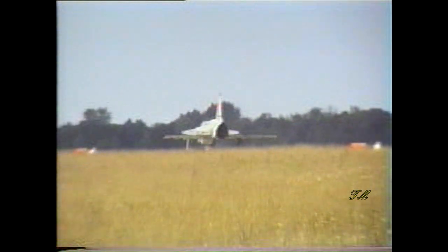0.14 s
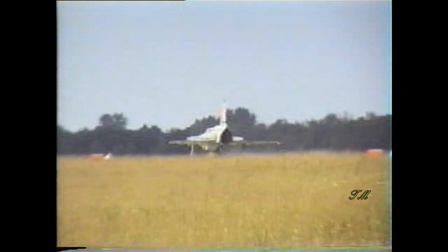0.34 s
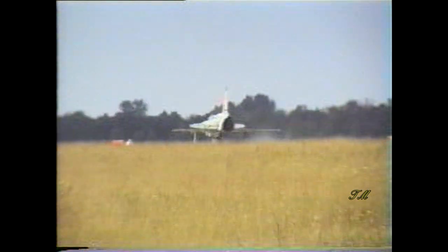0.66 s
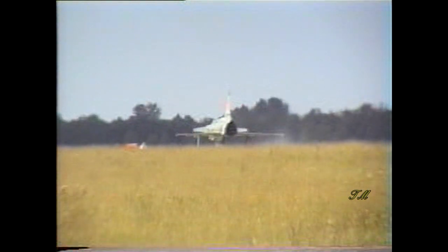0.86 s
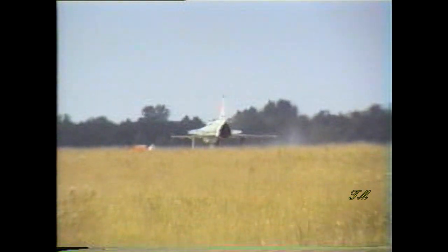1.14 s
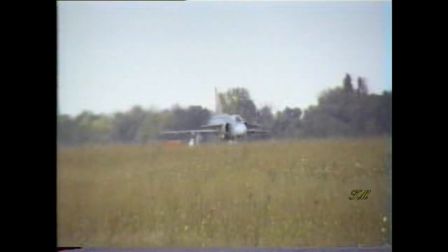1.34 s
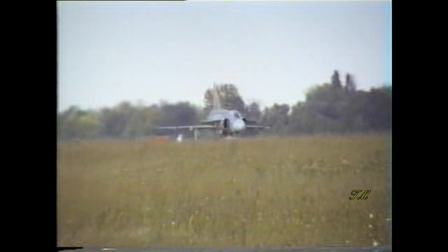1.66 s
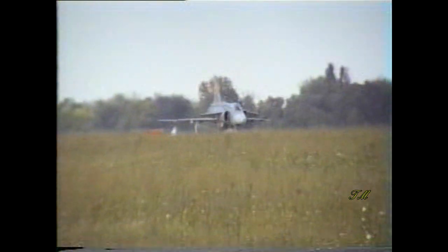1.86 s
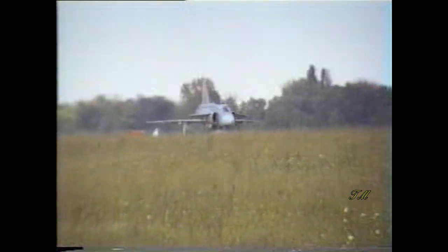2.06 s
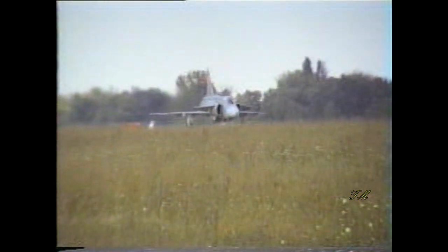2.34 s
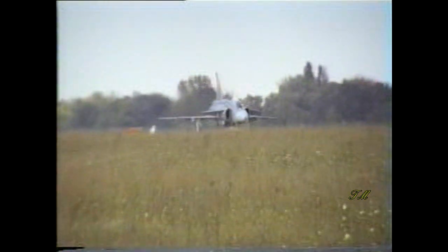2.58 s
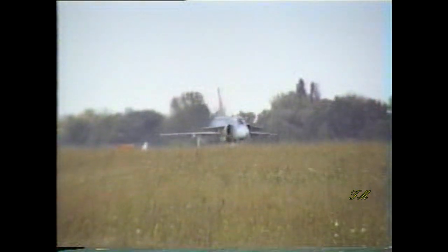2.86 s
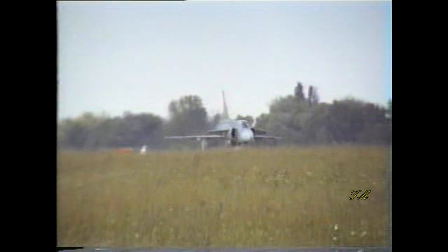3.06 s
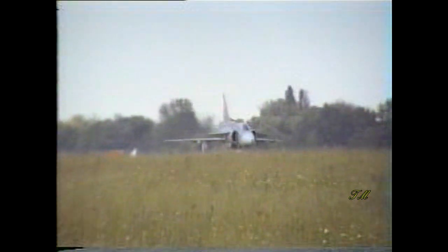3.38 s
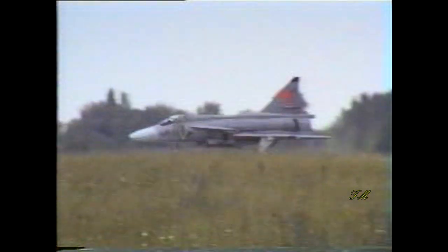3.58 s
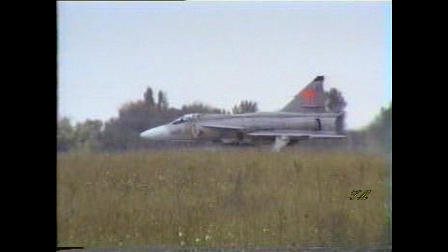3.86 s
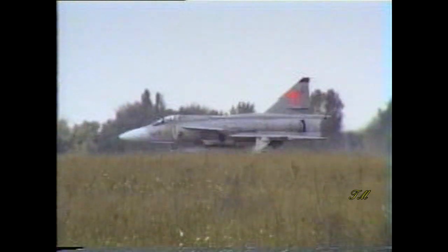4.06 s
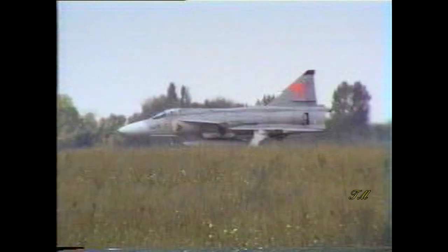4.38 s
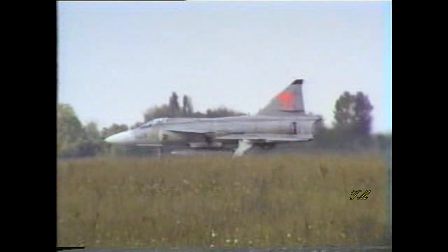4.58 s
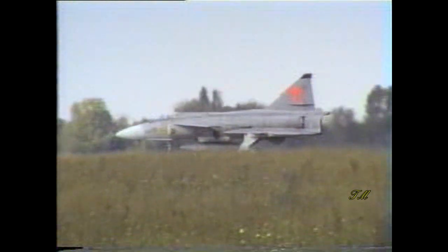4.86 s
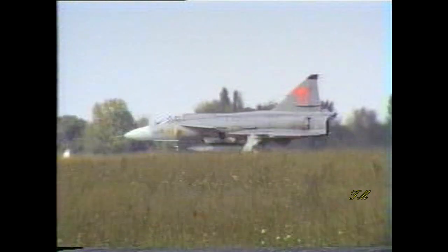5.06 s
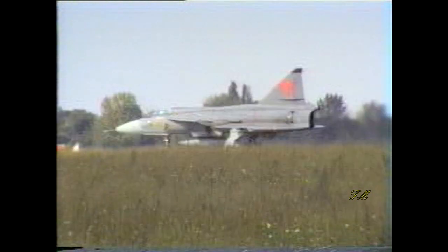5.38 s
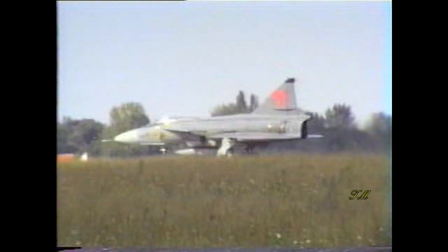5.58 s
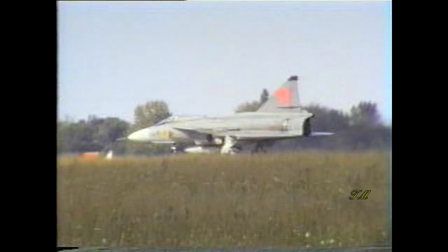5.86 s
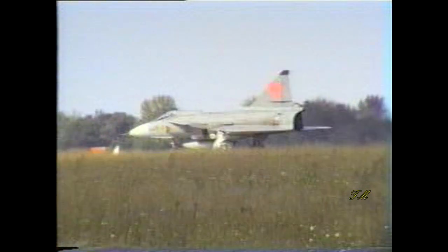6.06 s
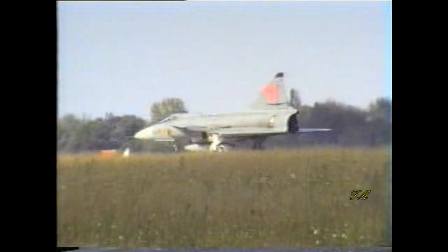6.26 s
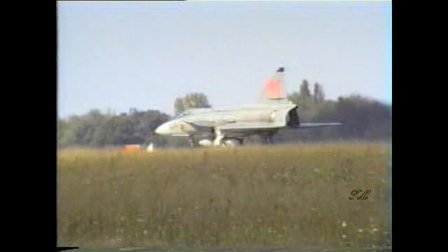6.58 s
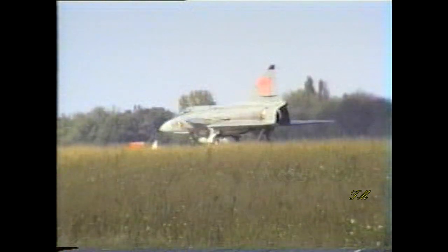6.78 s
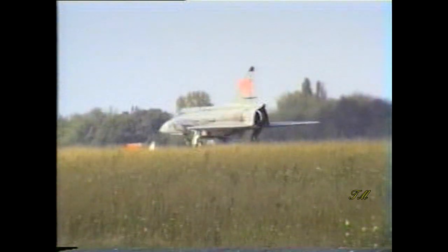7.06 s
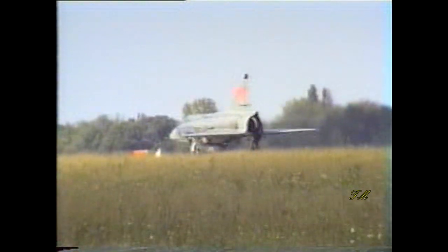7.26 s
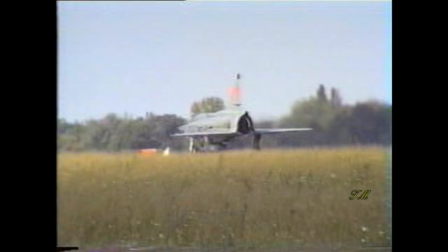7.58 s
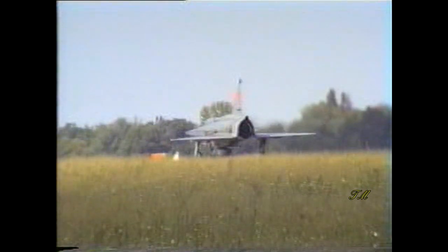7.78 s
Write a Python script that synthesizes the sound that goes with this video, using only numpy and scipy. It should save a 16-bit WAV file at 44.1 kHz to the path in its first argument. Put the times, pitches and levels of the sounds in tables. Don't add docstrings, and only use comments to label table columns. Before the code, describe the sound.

Heavy wind thumps open the scene, with a weak distant jet behind them. After about a second the whine jumps up in pitch and swells unevenly; more gusts batter the microphone and a far bird gives one falling note. Then the jet comes forward, whining and roaring brightly, turning its tail with a ragged hiss. Nearly mono old tape camera sound with constant hiss.

```python
import sys
import numpy as np
from scipy import signal
from scipy.fft import rfft, irfft, next_fast_len
from scipy.io import wavfile
from scipy.ndimage import uniform_filter1d

SR = 44100
rng = np.random.default_rng(int(sys.argv[2]) if len(sys.argv) > 2 else 0)


def pcm_store(signal):
    levels = np.round(np.clip(np.atleast_2d(signal), -1, 1) * 32767)
    wavfile.write(sys.argv[1], SR, levels.astype(np.int16).T)


def gain_from_db(level_db):
    decades = np.asarray(level_db, float) / 20
    return 10 ** decades


N = 349272
T = np.arange(N) / SR
SLOW = T[::32]
SIZE = next_fast_len(N, real=True)
FREQ = np.maximum(np.arange(SIZE // 2 + 1) * SR / SIZE, 1)

VIEW_STARTS = [
    0,
    1.2225,
    3.4635,
    8,
]

# frequency in Hz, level in dB per Hz.
HISS_COLOUR = [(200, -1.5), (6000, -2.5), (9000, -0.5), (12000, -1.5), (13500, -8.5), (14700, -14),
               (15300, -11), (16000, -3.5)]
# frequency in Hz,
# level in dB.
CAMERA_TONES = [(9093, -80), (11574, -81), (12813, -85), (13227, -87), (15125, -86), (15325, -88),
                (15625, -69), (15675, -85)]
# frequency in Hz, level in dB.
MOTOR_TONES = [(413.5, -66), (827, -60), (7441, -82), (9921, -83), (11161, -83)]
# time in seconds, pitch in Hz, level in dB.
BIRD_NOTE = [
    (3.23, 3290, -99),
    (3.27, 3260, -60),
    (3.34, 3140, -57),
    (3.4, 3090, -99),
]

# centre in seconds, peak in dB, half length in seconds, sharpness in dB per octave.
GUSTS = [(0, -16, 0.03, 1), (0.07, -26, 0.036, 5.5), (0.676, -33.5, 0.12, -1.5), (0.252, -28.5, 0.16, -2.5),
         (0.967, -28, 0.053, -4), (1.305, -26.5, 0.22, 3), (1.316, -20, 0.039, 2.5), (1.705, -27, 0.1, 1.5),
         (1.79, -21.5, 0.031, 1.5), (1.887, -23, 0.04, 2.5), (1.97, -20, 0.077, -4.5),
         (2.207, -29.5, 0.084, -6.5), (2.437, -28.5, 0.16, -1), (2.6, -26, 0.029, -11.5),
         (2.799, -19.5, 0.1, 3), (2.952, -23, 0.026, -1), (3.047, -27, 0.038, -4),
         (3.019, -20.5, 0.19, 0.5), (3.198, -26.5, 0.045, 6.5), (3.407, -18.5, 0.12, -2),
         (3.597, -32.5, 0.16, 7)]
# centre in seconds, peak in dB, half length in seconds,
# sharpness in dB per octave.
PUFFS = [
    (5.95, -51, .08, -2),
    (7.45, -35.5, 0.036, -4),
    (7.63, -34.5, 0.029, -8),
]
# time in seconds, peak in dB, pitch in Hz.
THUMPS = [(0.027, -20, 112), (0.057, -8.5, 113), (0.09, -6.5, 103), (0.125, -9.5, 112), (0.175, -14.5, 102),
          (1.116, -21, 85), (1.143, -18, 134), (1.17, -20, 106), (1.237, -17, 108), (1.274, -24, 93),
          (1.294, -21, 83), (1.317, -16.5, 133), (1.335, -12, 107), (1.357, -23, 107), (1.414, -21, 107),
          (1.438, -19.5, 168), (1.674, -21, 107), (1.697, -12.5, 158), (1.727, -19, 76), (1.773, -16, 95.5),
          (1.814, -21, 84), (1.835, -8, 93), (1.858, -6, 71), (1.879, -11, 68), (1.905, -14, 57),
          (1.935, -15, 81), (1.978, -15, 75.96), (1.999, -13, 84), (2.027, -23, 67), (2.162, -18.5, 116),
          (2.603, -21.5, 57.92), (2.636, -23, 86), (2.688, -20, 88), (2.737, -11.5, 95), (2.775, -9, 75),
          (2.826, -16.5, 82.5), (2.867, -13.5, 124), (2.923, -14, 64), (2.958, -11, 108), (2.992, -20, 100),
          (3.034, -7.5, 120), (3.055, -9.5, 111), (3.089, -15, 133), (3.11, -21, 101), (3.139, -25, 131),
          (3.165, -12, 82), (3.191, -12, 109), (3.227, -13, 106), (3.254, -20, 119), (3.276, -19, 96),
          (3.302, -22, 81), (3.33, -18, 97), (3.353, -10.5, 63), (3.394, -29, 67), (3.427, -13.5, 122),
          (3.458, -11.5, 94), (3.495, -22, 98), (3.528, -22, 85), (3.578, -24, 93), (3.648, -23, 101)]
# time in seconds, level in dB, exhaust thrum in dB.
RUMBLE = [(0, -46.5, 15), (3.7, -37.5, -3.5), (4.9, -38, -3.5), (5.5, -40, 0), (6, -40, 5.5),
          (6.8, -38.5, 2.5), (7.5, -36.5, 0), (7.92, -35.5, 0)]
# frequency in Hz, level in dB per Hz.
GUST_COLOUR = [(10, -14), (25, -13), (50, -1.5), (90, -0.5), (140, -5), (200, -9.5), (300, -25), (450, -43)]
# frequency in Hz, level in dB per Hz.
RUMBLE_COLOUR = [(10, -16), (22, -2), (43, -1), (76, -5), (141, 0.5), (170, -7), (215, -15), (450, -29.5)]

# time in seconds, jet level in dB, how far the intake faces the microphone in dB.
ROAR = [
    [(0, -48, 0.5), (.5, -47.5, -1.5), (1.222, -51.5, 2)],
    [(1.222, -43, 4), (1.65, -39.5, 2), (2.0, -42.5, 0), (2.5, -41.5, 0.5), (2.85, -40.5, 5.5),
     (3.463, -39, 1.5)],
    [(3.463, -34, 9.5), (4.0, -32.5, 9), (4.45, -32, 6.5), (5.0, -32.5, 5), (5.5, -35, 2.5),
     (6.25, -33.5, -1), (6.8, -32.5, -1.5), (7.42, -28, -4), (7.92, -34, -3.5)],
]
# frequency in Hz, level in dB per Hz.
TAIL_COLOUR = [(300, -19), (480, -5.5), (650, -1), (850, 0), (1200, -5.5), (1700, -11.5), (2100, -9.5),
               (2600, -19.5), (3200, -25), (4000, -22), (5000, -35), (7000, -45)]
# frequency in Hz, level in dB per Hz.
NOSE_COLOUR = [(300, -13), (490, -17), (750, 4), (1200, -2), (1450, 2.5), (2000, -12.5), (2250, -5),
               (2700, -12.5), (3500, -18.5), (4300, -24), (5300, -32), (7000, -69)]
# frequency in Hz, level in dB per Hz.
TURN_COLOUR = [(300, -18.5), (450, -17), (650, -3.5), (950, 1), (1200, -11), (1450, -4), (1780, -13.5),
               (1960, -17.5), (2350, -15), (3500, -26.5), (4300, -28.5), (4800, -25.5), (5400, -39.5),
               (7000, -42)]
# time in seconds, frequency factor.
HUMP_SHIFT = [
    (3.7, 0.99),
    (4.5, 1.074),
    (5.5, 1),
]
# centre in seconds, frequency in Hz, change in dB, half
# length in seconds.
ROAR_CHANGES = [(1.35, 690, -5.5, 0.17), (2.97, 1330, -11, 0.46), (5.7, 1140, -6.5, 0.089),
                (7.2, 1730, -2, 0.87), (4.9, 1750, -4, 0.06), (8.7, 1300, -1, .2), (3.2, 470, 7.5, 0.64),
                (6.9, 4900, 2, 0.67), (7.76, 4000, 4, 0.47), (7.77, 386, 8, 0.37), (2.2, 2200, -1.5, 0.37),
                (5.6, 1700, -0.5, .3), (6.6, 1480, -1.5, 1), (7.3, 870, -0.5, 0.21), (4.66, 1400, -4, 0.15),
                (1.2, 410, 2, .15), (2.6, 2220, -8, .07), (6.2, 2500, 6, 0.18), (7.8, 1300, -2.5, 0.11),
                (1.33, 380, -6, .08), (3.67, 360, 6, 0.22), (4.6, 670, 3.5, .12), (3.55, 4200, -0.5, .1),
                (4.62, 3800, 2, 0.11), (5.07, 3800, 1.5, 0.11), (5.07, 4800, 2.5, 0.077), (4.65, 4200, 1, 0.1),
                (7.8, 1040, -3.5, 0.1), (2.4, 370, -9, .1)]
# centre in seconds, lift in dB, half length in seconds.
FLARES = [(3.5, 4, 0.13), (4.2, 2.5, 0.073), (3.6, -2.5, 0.098), (6.6, 2, 0.092), (5.06, 2.5, 0.056),
          (8, -1, 0.071), (4.76, 2, 0.08), (5, 5, 0.087), (7.75, 1.5, 0.18), (8.6, 3, 0.089)]
# time in seconds, centre in Hz, level in dB.
NOZZLE = [(5.7, 4645, -75), (6.0, 4660, -58), (6.25, 4660, -62), (6.4, 4680, -58), (6.76, 4650, -61),
          (6.85, 4640, -51), (7.0, 4680, -57), (7.15, 4640, -54), (7.33, 4650, -52), (7.45, 4680, -54),
          (7.58, 4800, -56), (7.72, 4860, -53), (7.92, 4850, -57)]

TAIL_STAGES = [1, 1.331, 1.485]
STAGES = [1, 1.333, 1.467, .583]
# time in seconds, pitch in Hz.
BLADE_RATE = [(0, 1372), (.3, 1370), (1.222, 1365), (1.223, 1682), (1.8, 1678), (2.7, 1681), (3.463, 1678),
              (3.464, 1608), (3.96, 1606), (4.46, 1595), (4.72, 1588), (4.9, 1590), (5.1, 1580),
              (5.4, 1578), (5.65, 1572), (5.85, 1583), (6.15, 1593), (6.5, 1590), (6.93, 1583), (7.3, 1578),
              (7.92, 1575)]
# time in seconds, speed factor.
SECOND_SPOOL = [
    (4.75, 1),
    (5.0, 1.009),
    (5.5, 1.015),
    (5.68, 1),
]
# centre in seconds, peak in dB, half length in seconds.
SWELLS_1 = [(.33, -48.5, 0.076), (0.11, -54, .1), (.85, -58, 0.071), (1.03, -55, 0.062),
            (1.82, -39.5, 0.23), (2.31, -42, 0.23), (2.86, -44.5, 0.15), (3.35, -41, 0.08),
            (3.59, -26, 0.08), (3.72, -32, 0.03), (4.85, -38, 0.1), (5.65, -42, 0.088), (7.2, -40, 0.11),
            (3.87, -32, 0.18), (4.23, -34, 0.031), (5.19, -35.5, 0.54), (5.8, -32.5, 0.07),
            (6.14, -38, 0.14), (6.61, -39, 0.1), (7.52, -36, 0.029), (7.83, -37, 0.044)]
# centre in seconds, peak in dB, half length in seconds.
SWELLS_2 = [(2.92, -38.5, 0.086), (4.12, -39, .04), (.2, -67, .15), (.6, -59, .15), (.9, -60, 0.039),
            (1.35, -27.5, 0.12), (1.53, -28.5, 0.096), (1.78, -35, 0.069), (2.22, -34.5, 0.15),
            (2.74, -30, 0.14), (3.19, -38, 0.54), (3.5, -32.5, 0.037), (3.99, -35, 0.029),
            (3.94, -32, 0.23), (4.38, -31.5, 0.064), (4.76, -30.5, 0.072), (5.48, -32, 0.21),
            (6.38, -40, 0.051), (7.54, -40.5, 0.11), (7.84, -40, 0.07), (4.86, -35.5, 0.05),
            (5.28, -42, 0.045), (5.8, -45, 0.12), (6.9, -44, 0.079)]
# centre in seconds, peak in dB, half length in seconds.
SWELLS_3 = [(.3, -63, .1), (.6, -55, .06), (1.0, -64, .1), (1.52, -39, 0.15), (2.84, -37, 0.12),
            (3.04, -42, 0.1), (3.43, -39.5, 0.09), (3.5, -36, 0.057), (3.63, -30, 0.05), (3.93, -35, 0.045),
            (4.13, -33, 0.062), (4.27, -35, 0.11), (5.78, -34, 0.016), (6.55, -39.5, 0.13),
            (7.13, -32, 0.05), (7.39, -36.5, 0.065), (7.67, -33.5, 0.06), (7.9, -32.5, 0.064),
            (3.467, -27, 0.011), (5.1, -41, 0.037), (5.35, -45, 0.12), (6.38, -45, 0.035),
            (7.77, -36.5, 0.17), (3.2, -45.5, .12)]
# centre in seconds, peak in dB, half length in seconds.
SWELLS_4 = [(3.5, -40, 0.04), (3.62, -28.5, 0.029), (3.909, -38.5, 0.064), (4.44, -45, 0.096),
            (4.74, -43, 0.046), (5.48, -38, 0.26), (6.54, -33.5, 0.34), (7.17, -32, 0.079),
            (7.4, -30, 0.078), (7.58, -32.0, 0.061), (7.76, -40, 0.12)]
# centre in seconds, peak in dB, half length in seconds.
SWELLS_HALF = [
    (3.86, -42, 0.15),
    (4.7, -49, 0.19),
    (5.2, -49, 0.25),
    (6.4, -56.5, 0.36),
]
BETWEEN_DB = [
    (-59, -62.5, -63),
    (-55, -60, -51.5),
    (-46.5, -44, -44.5, -72),
]
SUM_PAIRS = [(0, 0), (0, 1), (0, 2), (1, 1)]
SUM_DB = [
    (-73, -90, -90, -76),
    (-59, -66, -61, -66.5),
    (-55, -66, -58, -65),
]
SUM_DRIFT = [
    (0, 0, 0, 0),
    (1.5, -1, 2, 3),
    (-.5, .5, .5, -.5),
]
# centre in seconds, lift in dB, half length in seconds.
SUM_SWELLS = [
    [(1.55, 2, 0.12), (1.83, -6, 0.11), (2.3, 4, 0.39), (2.72, -6, .05), (2.95, 4, .12), (3.3, 1, 0.11),
     (3.7, 3.5, .2), (4.5, 8, 0.1), (4.78, 0, 0.051), (5.05, 6, .08), (5.37, 10, .1)],
    [(1.5, 5, 0.16), (2.0, -4, .15), (2.85, 3, .06), (3.2, 4, .2), (3.5, 4, .05), (4.12, 17, .08)],
    [(1.45, 0, .2), (1.85, -1, .1), (2.2, 3, 0.22), (2.6, 1, .05), (2.9, 5, .17), (3.5, 10.5, 0.058),
     (4.1, 6, .1), (4.3, -1, 0.068), (6.6, 3, .08)],
    [(1.45, 1, .25), (2.2, 4, .3), (3.0, -6, .2), (3.38, 1, .06), (7.8, 13, .13)],
]

# frequency in Hz, level in dB.
SIDE_COLOUR = [(900, -55), (1500, -43.5), (2100, -27.5), (2800, -19), (4000, -29), (8000, -20),
               (15000, -22)]
# frequency in Hz, threshold in spreads.
SIDE_SHY = [(1400, .4), (2000, -.8), (3000, -.8), (3600, .1), (6500, .2), (7500, .6), (15000, 1.3)]


def fast(slow):
    return np.interp(T, SLOW, slow)


def curves(table):
    s, *columns = np.transpose(table)
    return np.array([np.interp(SLOW, s, column) for column in columns])


def walk(rate):
    held = max(int(len(SLOW) / T[-1] / rate), 1)
    steps = np.repeat(rng.standard_normal(len(SLOW) // held + 1), held)
    smooth = uniform_filter1d(uniform_filter1d(steps, held), held)
    return 1.294 * smooth[:len(SLOW)]


def bell(s, half_s):
    return np.exp(-((SLOW - s) / half_s) ** 2)


def lifts(table):
    return sum(db * bell(s, half_s) for s, db, half_s in table)


def swells(s, db, half_s):
    return gain_from_db(2 * db) @ bell(s[:, None], half_s[:, None])


def gate(view):
    seen = (SLOW >= VIEW_STARTS[view]) & (SLOW < VIEW_STARTS[view + 1])
    return uniform_filter1d(1. * seen, size=2)


def read(colour, hz):
    f, db = np.transpose(colour)
    return np.interp(np.log(hz), np.log(f), db)


def tint(x, colour):
    return irfft(rfft(x, SIZE) * gain_from_db(read(colour, FREQ)), SIZE)[:N]


def band_db(colour, lo_hz, hi_hz):
    inside = FREQ[(FREQ > lo_hz) & (FREQ < hi_hz)]
    return 10 * np.log10(gain_from_db(2 * read(colour, inside)).sum())


def turns(hz):
    return 2 * np.pi * np.cumsum(fast(hz)) / SR


def tone(phase, db, halo_db, halo_hz):
    straight = gain_from_db(db) * (1 + gain_from_db(halo_db) * walk(halo_hz))
    across = gain_from_db(db + halo_db) * walk(halo_hz)
    return np.sqrt(2) * (fast(straight) * np.sin(phase) + fast(across) * np.cos(phase))


def turbulence(gain, lo_hz, hi_hz, step, slow_db, quick_db, quick_rate):
    white = rfft(rng.standard_normal(SIZE)) * np.sqrt(SIZE / 2)
    out, swell, octaves = 0, walk(3.4), np.log2(FREQ)
    for octave in np.arange(np.log2(lo_hz), np.log2(hi_hz), step):
        shape = np.clip(1 - abs(octaves - octave) / step, 0, 1)
        band = irfft(white * shape, SIZE)[:N]
        swell = 0.33 * swell + 0.081 * walk(3.36)
        motion_db = slow_db * swell + quick_db * walk(quick_rate)
        out = out + band * fast(gain(2 ** octave) * gain_from_db(motion_db))
    return out


def hiss():
    x = tint(rng.standard_normal(N), HISS_COLOUR)
    return gain_from_db(-55.5) * x / x.std()


def camera():
    lines = 0
    for hz, db in list(CAMERA_TONES) + list(MOTOR_TONES):
        lines = lines + gain_from_db(db) * np.sin(2 * np.pi * (hz * T + rng.random()))
    return np.sqrt(2) * lines


def bird():
    hz, db = curves(BIRD_NOTE)
    return tone(turns(hz), db, halo_db=-12, halo_hz=40)


def thumps():
    out = np.zeros(N)
    for (s, db, hz), start in zip(THUMPS, rng.random(len(THUMPS))):
        near = slice(max(int((s - .04) * SR), 0), int((s + .04) * SR))
        cycles = (T[near] - s) * hz
        fade = np.exp(-(cycles / 0.55) ** 2)
        out[near] += gain_from_db(db) * fade * np.sin(2 * np.pi * (cycles + start))
    return out


def wind():
    drops_s, drop_length_s = 3.69, 0.0336
    pivot_hz, thrum_hz, thrum_octaves = 88.5, 100, 0.57
    bed_db = -2.5
    blowing = np.clip((drops_s - SLOW) / drop_length_s + .5, 0, 1)
    rumble_db, thrum_db = curves(RUMBLE)
    gust_own_db, rumble_own_db = band_db(GUST_COLOUR, 20, 350), band_db(RUMBLE_COLOUR, 20, 350)

    def blow(table, hz):
        s, db, half_s, sharp_db = np.transpose(table)
        octaves = max(np.log2(hz / pivot_hz), -1.2)
        return swells(s, db - gust_own_db + read(GUST_COLOUR, hz) + sharp_db * octaves, half_s)

    def gain(hz):
        thrum = thrum_db * np.exp(-(np.log2(hz / thrum_hz) / thrum_octaves) ** 2)
        rumble = gain_from_db(rumble_db - rumble_own_db + read(RUMBLE_COLOUR, hz) + thrum)
        gusts = blowing * gain_from_db(2 * bed_db) * blow(GUSTS, hz)
        return np.sqrt(gusts + blow(PUFFS, hz) + rumble ** 2)

    bands = turbulence(gain, 14.03, 460, step=2 / 5, slow_db=-3.3, quick_db=1.6, quick_rate=21)
    lumps = gain_from_db((.6 + 1.1 * blowing) * walk(45))
    return bands * fast(lumps) + thumps()


def nozzle():
    hz, db = curves(NOZZLE)
    phase = turns(hz * (1 + .004 * walk(9)))
    return fast(gate(2)) * tone(phase, db - 13 + 2.5 * walk(28), halo_db=13, halo_hz=380)


def roar():
    intake_octaves, intake_top_hz = 1.5, 4250
    exhaust_under_hz, exhaust_share = 560, 0.4
    dip_octaves = 0.24
    shift = curves(HUMP_SHIFT)[0]
    eddy_db = 0.78 * walk(14) + lifts(FLARES)
    colours = (TAIL_COLOUR, NOSE_COLOUR, TURN_COLOUR)
    intake_starts_hz = (1500, 950, 796)
    views = []
    for view, (table, colour, from_hz) in enumerate(zip(ROAR, colours, intake_starts_hz)):
        opening = gate(view) / gain_from_db(band_db(colour, 550, 880))
        views.append((*curves(table), colour, from_hz, opening))

    def gain(hz):
        seen_hz = hz / (shift if hz < 1400 else 1)
        bass = exhaust_share * np.clip(np.log2(exhaust_under_hz / hz), 0, 1)
        out = 0
        for jet_db, intake_db, colour, from_hz, opening in views:
            treble = np.clip(np.log2(hz / from_hz) / intake_octaves, 0, 1)
            treble = treble - np.clip(np.log2(hz / intake_top_hz), 0, 1)
            facing_db = (treble - bass) * intake_db + treble * eddy_db
            out = out + opening * gain_from_db(jet_db + facing_db + read(colour, seen_hz))
        change_db = 0
        for s, dip_hz, db, half_s in ROAR_CHANGES:
            nearness = np.exp(-(np.log2(hz / dip_hz) / dip_octaves) ** 2)
            change_db = change_db + db * nearness * bell(s, half_s)
        return out * gain_from_db(change_db)

    return turbulence(gain, 280, 7200, step=1 / 6, slow_db=.8, quick_db=1.8, quick_rate=18)


def focus(view):
    out = []
    for table, db in zip((SWELLS_1, SWELLS_2, SWELLS_3, SWELLS_4), BETWEEN_DB[view]):
        rows = np.array(table)
        rows = rows[(rows[:, 0] >= VIEW_STARTS[view]) & (rows[:, 0] < VIEW_STARTS[view + 1])]
        out.append(10 * np.log10(gain_from_db(2 * db) + swells(*rows.T)))
    return np.array(out)


def sum_tones(view, phase, level_db, flutter_db, halo_db):
    on = gate(view) > 0
    intake_db = curves(ROAR[view]).sum(axis=0)
    swell_shares = (0.11, 0.37, 0.36, .03)
    out = 0
    for (a, b), share, db, drift_db, table in zip(
            SUM_PAIRS, swell_shares, SUM_DB[view], SUM_DRIFT[view], SUM_SWELLS):
        parents_db = uniform_filter1d(level_db[a] + level_db[b], int(0.29 / SLOW[1]))
        move_db = 0.96 * intake_db + share * parents_db + drift_db * SLOW + lifts(table)
        sum_db = db + move_db - move_db[on].mean() - max(halo_db, 0)
        out = out + tone(phase[a] + phase[b], sum_db + flutter_db * walk(35), halo_db, halo_hz=190)
    return out


def whine(stages, view, flutter_db, wobble, wander, halo_db, sum_halo_db):
    hz, spool = curves(BLADE_RATE)[0], curves(SECOND_SPOOL)[0]
    level_db = focus(view)
    phase, out = [], 0
    for n, multiple in enumerate(stages):
        speed = spool if n > 1 else 1
        flutter = 1 + wobble * walk(30) + wander * walk(7)
        phase.append(turns(multiple * hz * speed * flutter))
        stage_halo_db = halo_db + 20 * np.log10(multiple)
        out = out + tone(phase[n], level_db[n] + flutter_db * walk(35), stage_halo_db, halo_hz=170)
    out = out + sum_tones(view, phase, level_db, flutter_db, sum_halo_db)
    if len(stages) > 3:
        half_db = 10 * np.log10(gain_from_db(2 * -57) + swells(*np.transpose(SWELLS_HALF)))
        out = out + tone(phase[3] / 2, half_db, halo_db=-25, halo_hz=29.6)
    return fast(gate(view)) * out


def residue(x):
    whole, octaves, out = rfft(tint(x, SIDE_COLOUR), SIZE), np.log2(FREQ), 0
    for octave in np.arange(np.log2(1300), np.log2(15500), 1 / 5):
        band = irfft(whole * (abs(octaves - octave) < 1 / 10), SIZE)[:N]
        blink = np.clip(3 * (walk(43) - read(SIDE_SHY, 2 ** octave)), 0, 1)
        out = out + 2 * band * fast(blink)
    return out


def scene():
    jet = whine(TAIL_STAGES, view=0, flutter_db=0.7, wobble=0.0015, wander=.002, halo_db=-15, sum_halo_db=-4)
    jet = jet + whine(STAGES[:3], view=1, flutter_db=.6, wobble=.0022, wander=.0008, halo_db=-17, sum_halo_db=-12)
    jet = jet + whine(STAGES, view=2, flutter_db=1.6, wobble=.0022, wander=.0026, halo_db=-11, sum_halo_db=6)
    broad = roar()
    mid = hiss() + camera() + bird() + wind() + nozzle() + broad + jet
    late_roar = np.roll(broad, int(.023 * SR))
    side = residue(late_roar + hiss())
    return np.array([mid + side, mid - side])


def band_limit(x):
    return signal.sosfilt(signal.butter(12, 15920, fs=SR, output="sos"), x)


def record(dry):
    rounded = np.tanh(2 * dry) / 2
    top_cut = signal.ellip(10, .2, 60, 15740, fs=SR, output="sos")
    mix = signal.sosfilt(top_cut, rounded)
    return band_limit(mix)


dry = scene()
out = record(dry)
pcm_store(out)
```